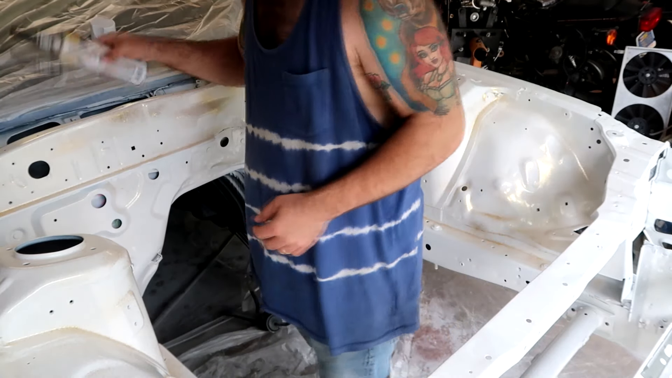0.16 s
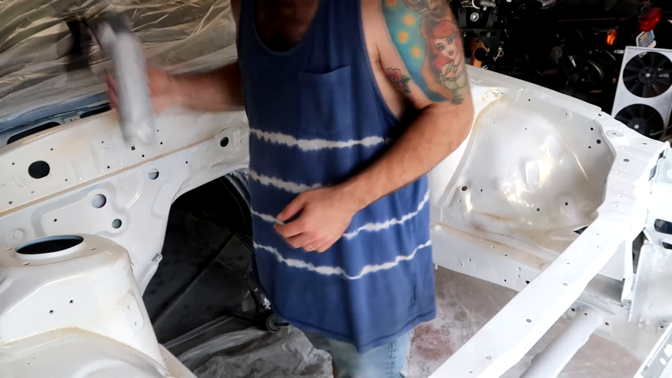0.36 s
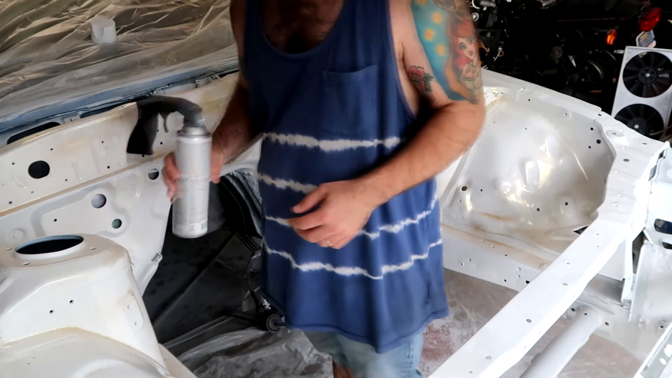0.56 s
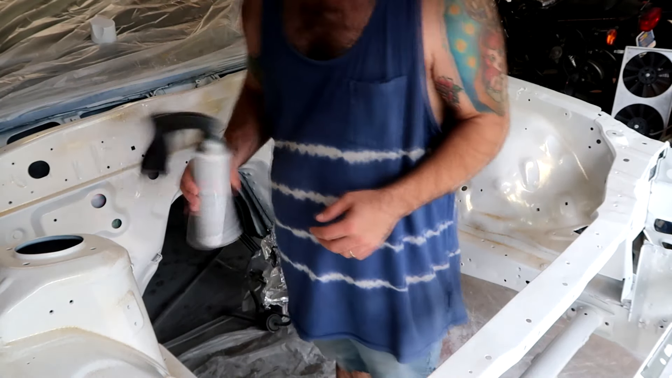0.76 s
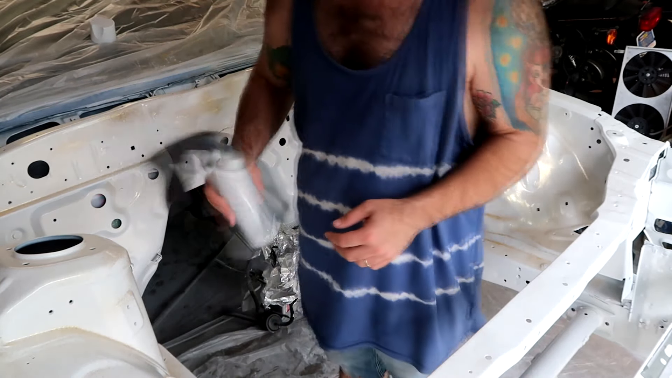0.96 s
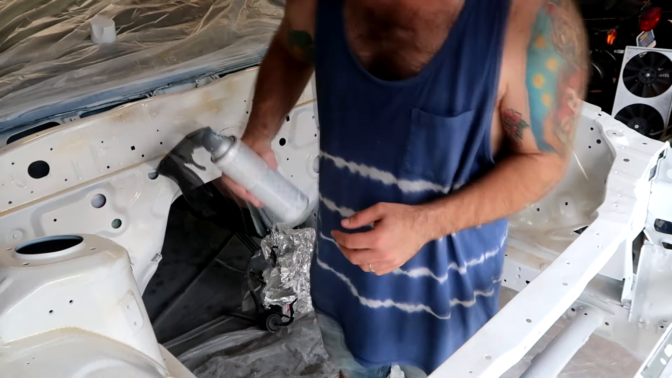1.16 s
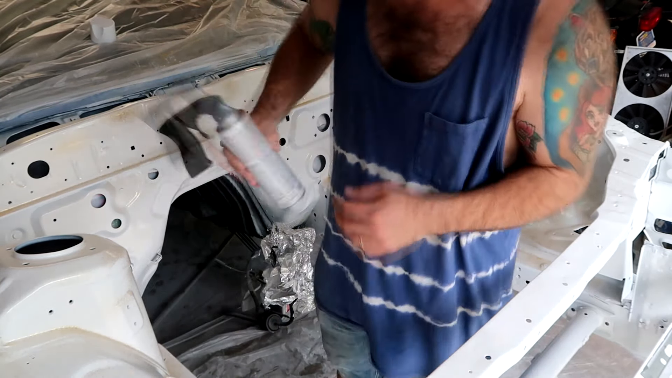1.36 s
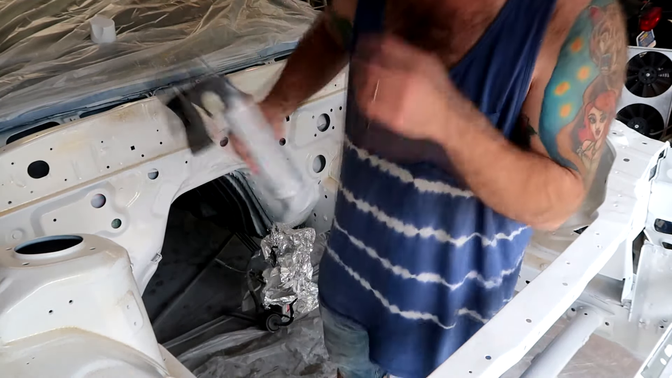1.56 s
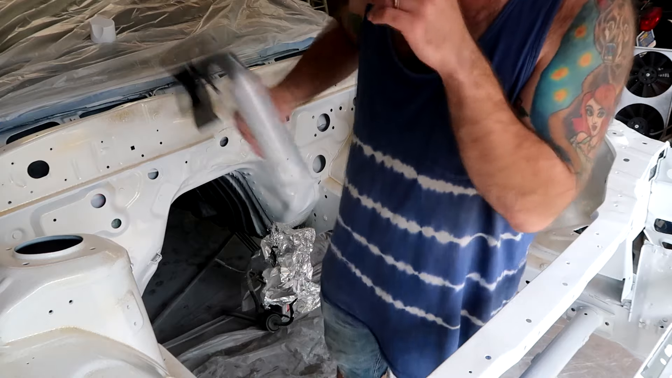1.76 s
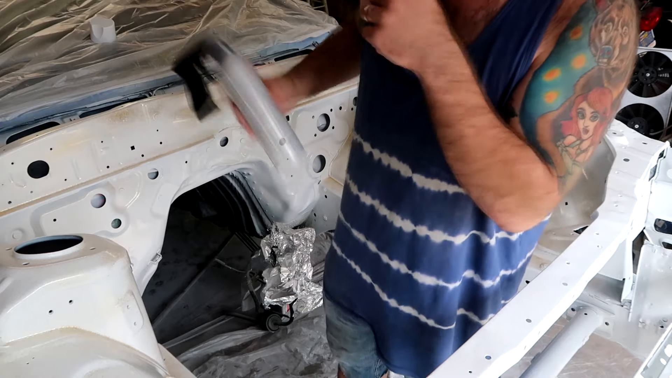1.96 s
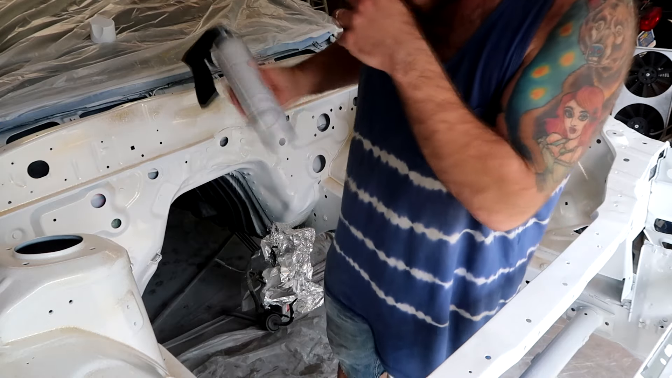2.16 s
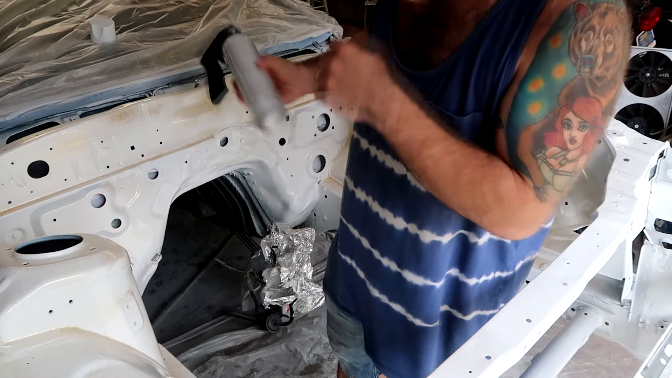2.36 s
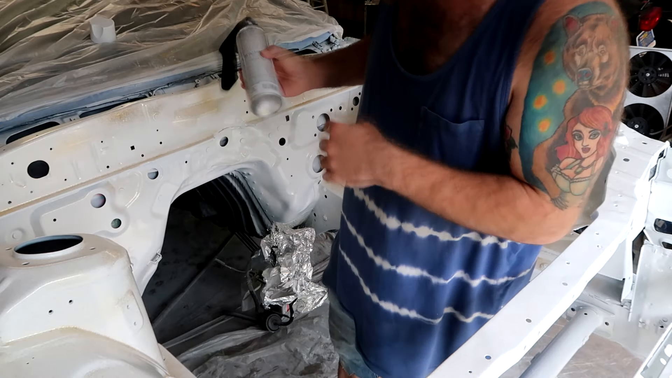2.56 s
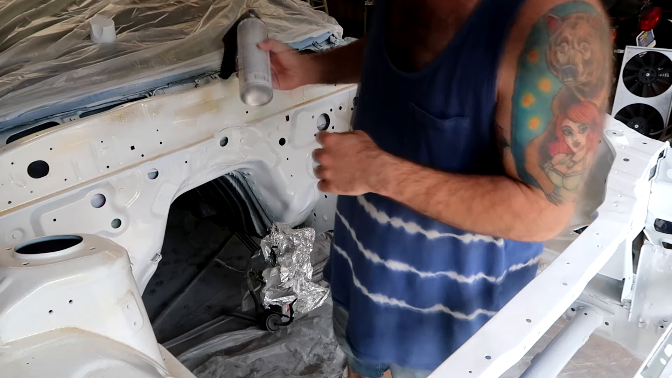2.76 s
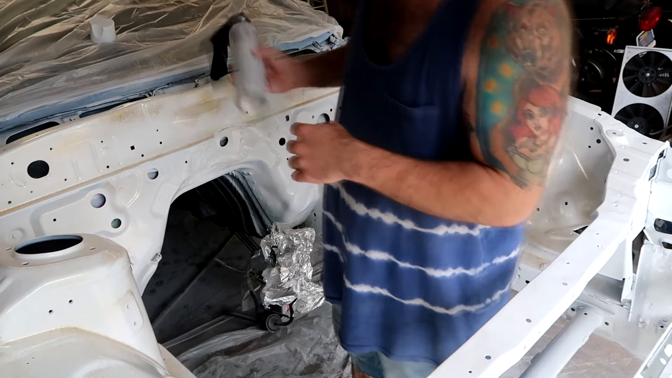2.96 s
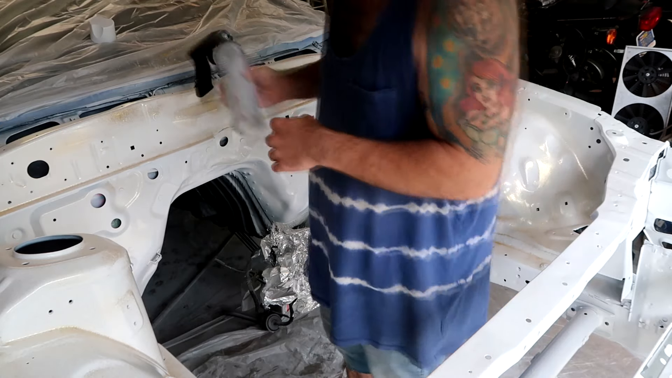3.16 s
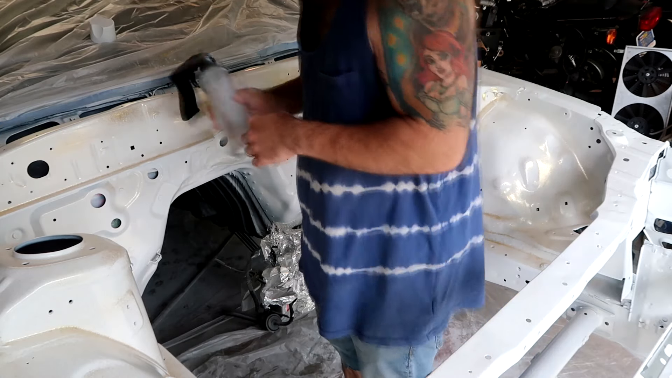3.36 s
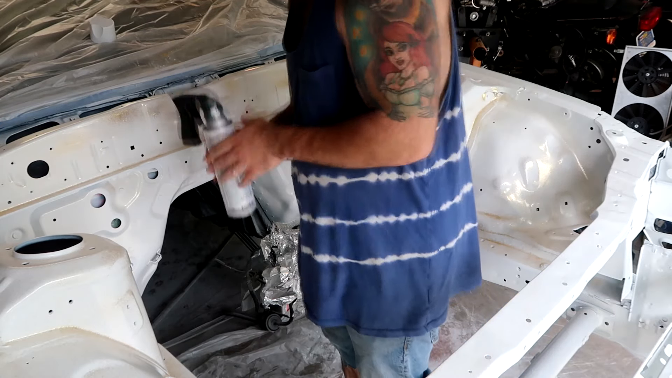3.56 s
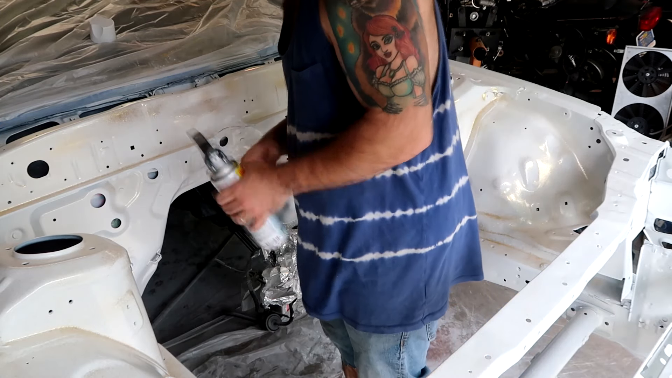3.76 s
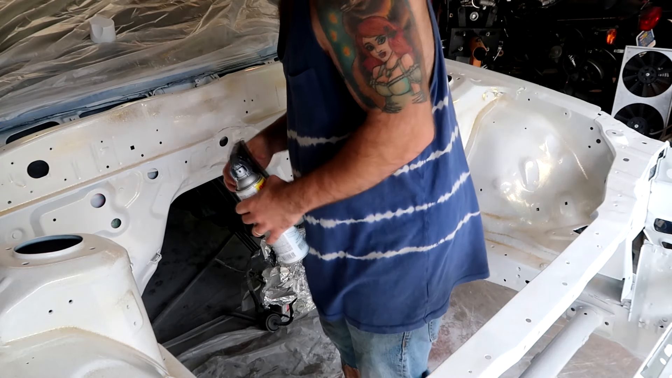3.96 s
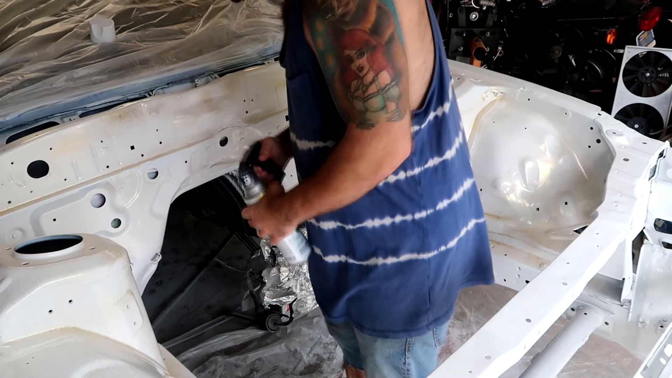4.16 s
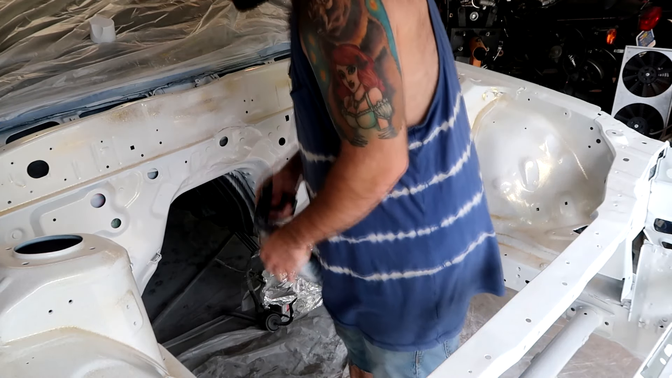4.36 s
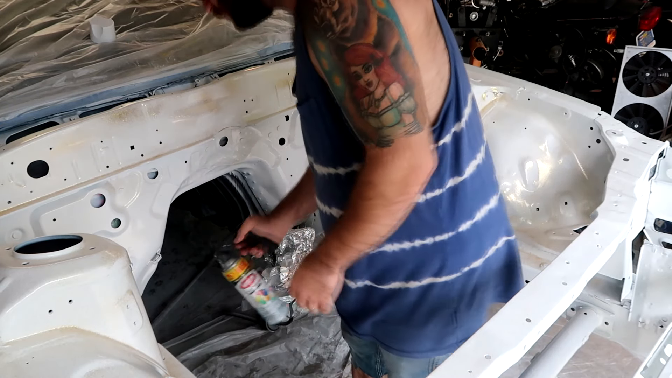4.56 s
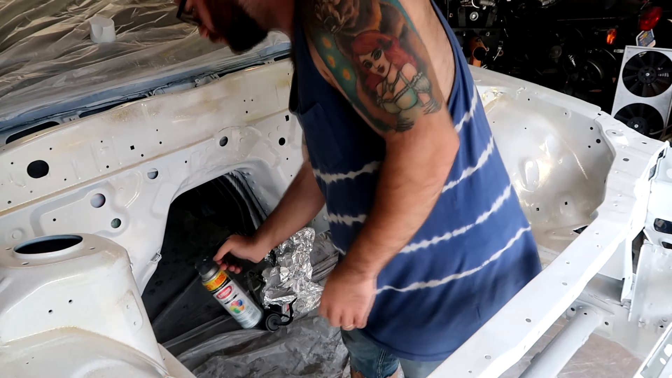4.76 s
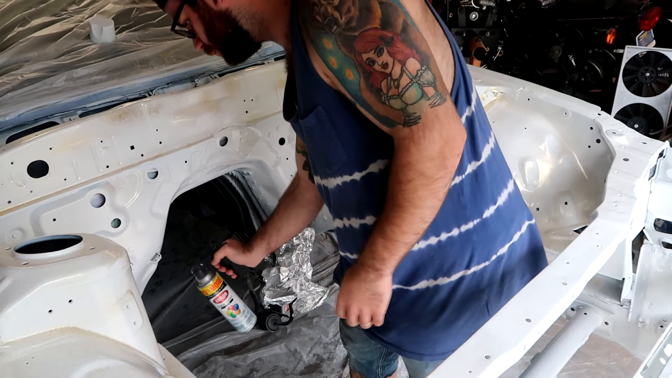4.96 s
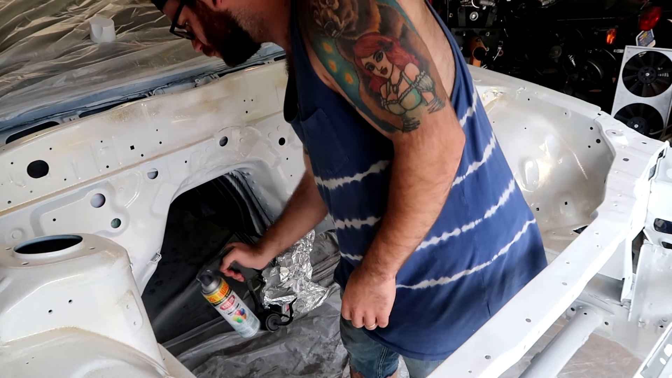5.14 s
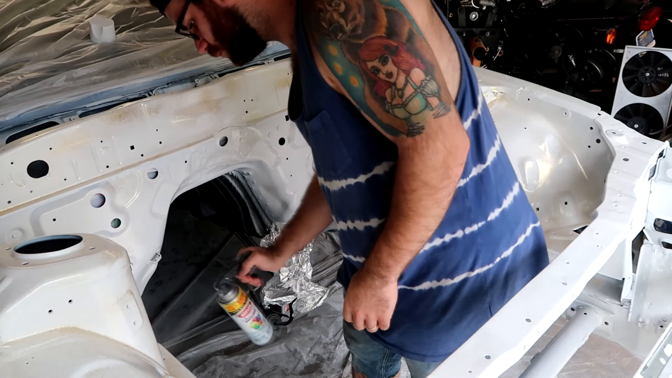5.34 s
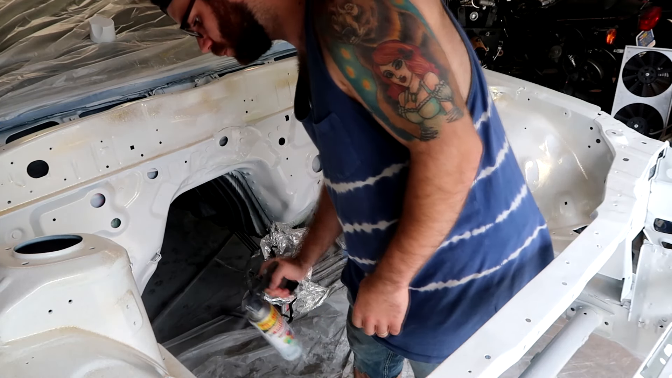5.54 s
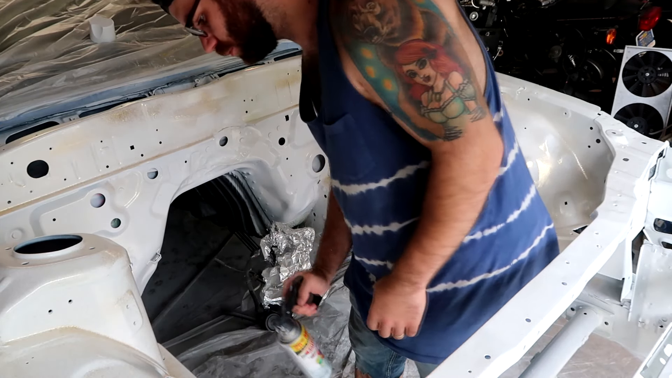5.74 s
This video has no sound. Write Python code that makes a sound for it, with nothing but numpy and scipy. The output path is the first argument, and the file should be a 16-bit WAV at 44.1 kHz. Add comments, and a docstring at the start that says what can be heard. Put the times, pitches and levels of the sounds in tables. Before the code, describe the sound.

Close to the microphone in a garage, a can scrapes lightly as it is picked up, then its mixing ball rattles wildly against thin steel, with short room echoes. The rattle loosens, weakens and stops; after a brief gap and a soft thud, spray hisses steadily with dull bumps over faint fan hum.

```python
"""Shaking and spraying a paint can

A spray paint can is picked up with a few scrapes and shaken hard in a garage. Its mixing ball strikes the thin
steel shell, rebounds and rolls: contact pulses through the shell's modes, with noise echoes for the room.
The rattle dies away, the valve opens and paint hisses out as flickering bands of noise around a narrow tone.
Brief squeaks, puffs of air and dull thuds come and go; a fan's noise and wavering tones hum over a low rumble.
"""
import sys
import numpy as np
from scipy import signal
from scipy.fft import rfft, irfft, next_fast_len
from scipy.io import wavfile
from scipy.ndimage import uniform_filter1d

SR = 44100
rng = np.random.default_rng(int(sys.argv[2]) if len(sys.argv) > 2 else 0)


def dump_mix(stems):
    """Bounce the given channels to the path in sys.argv[1] as a 16-bit WAV at rate SR."""
    frames = np.atleast_2d(stems).T  # one column per channel
    limited = np.clip(frames, -1, 1)  # hard clip at full scale
    pcm = np.round(limited * 32767).astype(np.int16)
    wavfile.write(sys.argv[1], SR, pcm)


N = 255807
TIME = np.arange(N) / SR

# Blows of the ball. Each row: start in seconds, clank level in dB before the ball's overall gain,
# strongest ring in Hz, second ring in Hz (often its close twin), ping in Hz, first rebound as a ratio to the
# contact, its delay in ms, then in dB relative to the clank: hollow knock, bright crack, high ping, steely tick.
BLOWS = [(0.2089, -22.5, 3550, 3600, 5170, 1.1, 2.15, -11.0, 4.5, -1, -9.5),
         (0.4892, -14, 2050, 2050, 5030, 1.3, 2.0, -13.5, -6.5, -4.5, -9.5),
         (0.5489, -2, 2170, 2160, 5030, 2.3, 2.1, -19, -7.5, -12.5, -16),
         (0.5554, -11.5, 2120, 2130, 4800, 1.4, 1.87, -12, -12, -11, -20.0),
         (0.561, -5.5, 2060, 2100, 5200, 0.94, 2.1, -25, -8, -10, -14.5),
         (0.5932, -19, 1900, 1910, 5200, 0.4, 4.7, -19, 0, -2, -6),
         (0.6251, -6.5, 2240, 2050, 4400, 1.8, 2.1, -13, -2.5, -20, -19.5),
         (0.6287, -11.5, 2530, 2470, 5140, 0.36, 2.4, -9, -8, 1.5, -11),
         (0.6415, -19, 2550, 2580, 4900, 1.6, 4.1, -13, 8, -17, -11),
         (0.6587, -13.0, 1850, 1910, 5300, 0.56, 2.25, -18, -8.5, -23, -22.5),
         (0.6717, -3, 1900, 1930, 5470, 0.33, 1.4, -19.5, -4.5, -10.5, -17),
         (0.7032, -7, 2210, 1640, 5500, 0.4, 2.65, -31, -6, -31, -26),
         (0.707, -9.5, 1800, 1770, 5400, 0.46, 2.15, -20, -6, -19, -21.5),
         (0.716, -9, 2200, 2190, 4600, 0.55, 2.2, -24.0, -13, -14, -20.0),
         (0.728, -20, 1700, 1700, 4700, 0.33, 5.7, -14, 5, -9.0, -12),
         (0.7379, -17, 3230, 3220, 4670, 0.98, 1.4, -17, 6.5, -1.5, -8),
         (0.7449, -26, 3120, 3140, 5900, 0.4, 2.2, -16, 12, -3, -11.0),
         (0.7586, -15, 2630, 1700, 5400, 0.58, 1.55, -12, 1, -10.0, -20.0),
         (0.7655, -22, 1950, 2400, 5100, 0.4, 3.6, -14.0, 3, -11.5, -19.5),
         (0.786, -8.0, 1650, 1700, 4900, 1.4, 1.9, -26, -18, -19.0, -22.5),
         (0.794, -15, 2680, 2540, 4400, 1.3, 1.9, -16, -4.5, -12.0, -15.5),
         (0.8007, -13, 2550, 2540, 4500, 0.6, 1.4, -20, -9.5, -15, -21.0),
         (0.8094, -21, 1800, 2260, 4670, 0.45, 4.5, -4, -6, -11.5, -18),
         (0.846, -1, 2070, 3140, 4900, 0.55, 2.4, -17.5, 1, -7.5, -18.5),
         (0.8724, -7, 2380, 2380, 4500, 1.4, 2.7, -24, -13, -12, -18.5),
         (0.8969, -10, 2040, 1980, 5300, 1.6, 2.15, -22, 1, -12, -18),
         (0.9211, -21, 3230, 3200, 5450, 0.59, 1.4, -20, 8.5, -2.0, -5),
         (0.9261, -18, 3300, 3300, 5100, 0.56, 2.3, -21, 6.5, -2, -18),
         (0.9721, -3.5, 2000, 2150, 4900, 0.78, 2.3, -15, -9, -13.0, -22),
         (0.9872, -7.0, 2300, 2200, 4500, 1.4, 1.75, -13, -17, -16.5, -24.5),
         (1.055, -2.5, 1870, 1770, 5400, 0.23, 1.43, -18, -1.5, -13, -19.5),
         (1.0589, -8, 1970, 1700, 5200, 0.34, 1.8, -16, -18, -14, -19),
         (1.082, -17, 2200, 2120, 4840, 0.76, 2.4, -15, -11.5, -14.0, -24.0),
         (1.105, -11, 1970, 1930, 5100, 0.5, 3.7, -13, -3, -12, -17),
         (1.13, -11.0, 2000, 1340, 4800, 0.55, 1.9, -14, -2.5, -12.5, -19.0),
         (1.1385, -15.5, 1750, 1280, 4800, 0.59, 3.9, -9, -16, -18.0, -17),
         (1.1678, -16.5, 1450, 1420, 4500, 0.45, 2.4, -16, -8, -21, -22),
         (1.1901, -15.5, 1250, 1210, 4700, 0.74, 2.1, -16, -10.5, -18.0, -27),
         (1.2304, -13.5, 1290, 4080, 4400, 0.6, 2.35, -18, -11.0, -12.5, -19.5),
         (1.2424, -11.5, 3000, 3000, 4400, 0.46, 1.37, -14, 10.5, 3, -4),
         (1.3127, -2, 1920, 1900, 5000, 2.7, 1.72, -14, -6, -19, -18.5),
         (1.3766, -12.5, 1900, 2000, 4800, 1.6, 2.3, -11, -5, -12, -19),
         (1.448, -5.5, 2220, 2160, 4950, 1.04, 0.86, -16, 6, -4, -17),
         (1.4972, -21.5, 1950, 1910, 4400, 0.5, 2.9, -9, -8, -7, -13),
         (1.5334, -3.5, 2010, 1910, 4750, 0.42, 2.76, -19, -5, -20, -20.5),
         (1.5557, -11.5, 1300, 1280, 4400, 0.5, 2.15, -10.5, -7, -16.5, -32),
         (1.587, -15.5, 2440, 1840, 4500, 0.75, 2.2, -17, -4, -16, -18),
         (1.5998, -17, 2500, 2490, 4530, 0.66, 2.6, -12.5, -11, -11.5, -19),
         (1.7687, -3.5, 2380, 3600, 4900, 0.34, 1.9, -19.5, -7, -11.5, -24),
         (1.886, -21.5, 2250, 1480, 4730, 0.51, 2.2, -8.5, -2.5, -10, -18),
         (1.982, -4, 1880, 2500, 5500, 0.19, 2.2, -20.5, -5.5, -10.5, -25.5),
         (2.0055, -16, 1800, 1770, 5500, 1, 2.05, -10, -2, -24, -15),
         (2.1627, -23.5, 2250, 2190, 4500, 0.68, 2.15, -13, -11.5, -22, -20),
         (2.2258, -6.5, 2050, 1820, 4900, 0.52, 1.5, -17.5, -12, -25, -16.5),
         (2.252, -8, 2780, 2640, 4500, 1.2, 2, -14, -12, -17, -26),
         (2.2993, -1.5, 2130, 1900, 4530, 0.78, 1.85, -29, 4, -5.5, -15),
         (2.3262, -20, 1900, 1910, 5700, 0.4, 2.2, -7, -16, -13.5, -31),
         (2.354, -34, 1950, 1910, 5200, 0.5, 2.2, -3, -9, -13, -23),
         (2.3892, -7.5, 2070, 2050, 4900, 0.48, 2.05, -13, -2, -22, -19),
         (2.4821, -23.5, 2550, 2540, 4460, 0.7, 2, -17, -6, -11, -16),
         (2.529, -12.5, 2040, 2700, 4600, 0.64, 2.0, -15.5, -10, -19.5, -32),
         (2.5508, -28.5, 3200, 3330, 4800, 1.3, 2.4, -25, 10, 0, 0),
         (2.5739, -14.5, 2300, 2240, 4600, 0.47, 1.8, -12, 5, -6, -18),
         (2.6841, -11.5, 1990, 1980, 5350, 1, 1.42, -14, -6, -10.5, -21.5),
         (2.8167, -6.0, 2100, 2100, 4960, 0.73, 2.1, -11, -6.5, -13.5, -18),
         (2.865, -18.5, 1900, 4150, 4680, 0.33, 1.6, -14, -21, -9, -33),
         (2.9119, -14.0, 2560, 2560, 4400, 1.2, 2.3, -8.5, -3.5, -8.5, -19),
         (2.9608, -15.5, 2500, 2480, 4400, 0.47, 3.85, -5.5, -15, -13, -25),
         (3.007, -13.5, 2150, 2120, 5530, 0.39, 3.35, -10.5, -1, -21, -23.5),
         (3.034, -14, 1860, 1930, 4400, 0.6, 1.9, -10.5, -10, -17, -18),
         (3.058, -11, 1820, 1400, 4360, 0.8, 2.2, -14, -10.0, -14, -23),
         (3.2232, -5.5, 1420, 1400, 4700, 0.38, 2.4, -10, 1, -9.5, -18.5),
         (3.3398, -12, 2580, 1410, 4700, 0.34, 2.15, -12.5, -5, -15.5, -21.5),
         (3.3839, -12.5, 1530, 1020, 5200, 0.57, 2.2, -3.5, -8, -11.0, -20),
         (3.4442, -14, 1930, 1280, 4500, 0.6, 2.1, -9.5, -7, -13.5, -19.5),
         (3.4942, -21, 1500, 1490, 4500, 0.87, 2.3, -11, -9, -13, -20),
         (3.5245, -11.0, 1520, 1490, 5450, 0.64, 2.55, -20, -8, -10.5, -20.5),
         (3.5754, -13.5, 2800, 2780, 4470, 0.58, 1.96, -6.5, -6, -13, -20.5),
         (3.665, -27, 1940, 1890, 4400, 1.4, 2.3, -3, -9, -12, -16),
         (3.7454, -5, 2190, 2180, 5450, 1.2, 0.99, -12.5, -4, -9, -20.5),
         (3.8552, -11.5, 1970, 2080, 5460, 1.2, 1.53, -28, -8.5, -19.5, -25),
         (3.9393, -16.5, 2050, 2410, 5500, 0.96, 2.6, -25, -12.0, -23.5, -24),
         (3.9673, -12.5, 2020, 1950, 5130, 0.4, 3.8, -19, -9, -18.5, -20.5),
         (4.054, -14.5, 2050, 2050, 5300, 0.47, 3.9, -15, -5, -18, -23),
         (4.1095, -24.5, 2150, 2120, 4800, 0.74, 1.7, -9, -11.0, -28, -40),
         (4.1259, -17, 1850, 1840, 5830, 0.27, 3.8, -13, -0.5, -3, -17.0),
         (4.1336, -21, 2000, 1350, 5500, 1.6, 2.4, -6, -12, -20, -28),
         (4.1691, -23, 2060, 2050, 5640, 0.55, 1.6, -13.0, 2, -4, -18),
         (4.1893, -23.5, 1350, 1350, 5600, 0.49, 3.55, -7, -13, -25, -30),
         (4.2003, -20.5, 1900, 1910, 5800, 0.7, 1.4, -7.5, 1, -7.5, -18.0),
         (4.2331, -20.5, 2070, 2060, 5600, 0.7, 1.26, -10.5, 0, -5.5, -18),
         (4.2536, -17.0, 2060, 2050, 5700, 0.94, 2.35, -17, -13, -21.5, -32),
         (4.2836, -31, 2060, 2050, 5800, 1.3, 2.5, -10, -1.0, -7, -25),
         (4.3005, -30, 2050, 2610, 5700, 0.3, 2.35, -5, 3, -10, -24),
         (4.3206, -29.5, 1800, 1860, 5700, 1.4, 1.8, -9, -4, -9, -21),
         (4.3353, -28.5, 1970, 1860, 5800, 1.4, 2.3, -15, -1, -7, -15),
         (4.4431, -32, 2450, 2400, 5600, 0.52, 2.45, -3, -10, -17.5, -23)]
# The shell's overall response. Each row: frequency in Hz, level in dB.
SHELL_RESPONSE = [(150, -38), (400, -7.5), (700, -4.5), (1000, 1.5), (1450, 6), (1920, 7.5), (2450, 4.5),
                  (3250, 1), (4300, -6.5), (5600, -8), (6700, -17), (8300, -19.5), (11500, -21.5),
                  (16000, -36.5)]
# Crossovers between knock, clank, crack, ping and tick, in Hz.
ZONE_EDGES_HZ = [1150, 2550, 3900, 6400]
# Modes of the steel that ring on after a blow. Each row: frequency in Hz,
# level in dB relative to the blow before a chance factor, t60 in seconds.
RINGING_MODES = [(1877, -14.5, 0.17), (2050, -19, 0.12), (2560, -18, 0.22), (3210, -26.5, 0.35),
                 (4060, -25.5, 0.055), (5450, -36, 0.41), (5400, -37.5, 0.17), (7300, -58, .22),
                 (7900, -40, 0.073), (10900, -36, 0.18), (11570, -62, 0.13)]
# How loudly the ball rolls along the wall. Each row: time in seconds, level in dB before the rolling gain.
ROLLING_LEVEL = [(0.1, -70), (0.24, -35.5), (0.45, -43.5), (0.74, -26), (1.1, -35), (1.6, -36.5),
                 (2.15, -42), (3.05, -35), (3.65, -51), (4.28, -39), (4.5, -41.5), (4.9, -60)]
# Colour of what the room gives back. Each row: frequency in Hz, level in dB.
ROOM_COLOUR = [(300, -3), (700, 6), (1300, -1), (2300, -2.5), (3400, -4.5), (4400, -2.5), (6000, -2.5),
               (8000, -1.5), (15000, -13.5)]
# Colour of the jet's hiss. Each row: frequency in Hz, level in dB.
HISS_COLOUR = [(2500, 3), (3400, -3), (3930, 0), (4130, -6), (4330, -3), (4750, -2), (5350, 1.5),
               (5750, 2.5), (6450, 7), (7250, -1), (7750, 0.5), (8380, -6.5), (9100, 0), (11400, 3.5),
               (13000, 0.5), (15000, -4), (15800, -14)]
# The rush of the spray cone. Each row: time in seconds, level in dB.
RUSH_LEVEL = [(5.04, -36), (5.09, -45.5), (5.2, -36), (5.28, -38), (5.36, -43), (5.57, -43.5),
              (5.63, -38.5), (5.7, -45.5), (5.8, -45)]
# Resonances of the rush. Each row: frequency in Hz, width in Hz, level in dB relative to one another.
RUSH_MODES = [(1300, 630, -12), (2080, 570, 13), (2760, 350, -24)]
# The can scraping as it is picked up and turned in the hand.
# Each row: centre in seconds, level in dB, length in seconds.
SCRAPES = [(0.093, -50.5, 0.18), (0.172, -40, 0.026), (0.251, -35, 0.069), (0.39, -44.5, 0.14),
           (4.473, -49, 0.052), (4.556, -54, 0.051)]
# Colour of the scraping. Each row: frequency in Hz, level in dB.
SCRAPE_COLOUR = [(800, -51), (2000, 13), (2750, 1), (3500, 0), (4400, -1), (6500, -11), (12000, -14),
                 (16000, -25)]
# Brief hollow tones, squeaks and whistles. Each row: centre in seconds, level in dB, pitch in Hz,
# length in seconds, unsteadiness of pitch as a share.
TONES = [(0.26, -30, 2740, 0.042, .035), (0.245, -38, 3480, 0.049, 0.033), (0.395, -46, 4320, 0.054, 0.017),
         (0.453, -39, 1850, 0.041, .03), (0.52, -30.5, 570, 0.017, .055), (0.562, -37.5, 547, 0.098, .055),
         (0.708, -40, 555, 0.065, .055), (4.562, -50, 2670, 0.036, .02), (5, -48, 2890, 0.05, .005),
         (5.257, -40, 6500, .07, .008), (5.444, -36.5, 6270, 0.028, .008), (5.528, -34, 336, 0.038, .055),
         (5.53, -34.5, 403.3, 0.033, .055), (5.678, -34.5, 327, 0.076, .055)]
# Dull thuds. Each row: start in seconds, level in dB, pitch they fall to in Hz.
THUDS = [(0.027, -36, 265), (3.154, -24, 108), (4.636, -19, 103), (5.2267, -14.5, 102), (5.599, -14.5, 106)]
# Colour of the scuff that comes with each thud. Each row: frequency in Hz, level in dB.
SCUFF_COLOUR = [(120, 10.5), (230, 14.5), (330, -4), (700, -3.5), (1250, 1), (2400, -4.5), (3300, -7.5),
                (6000, -60)]
# Puffs of air from the widest swings. Each row: centre in seconds, level in dB, length in seconds.
GUSTS = [(0.83, -40, 0.069), (0.967, -46, 0.13), (1.19, -45, 0.052), (1.23, -34.5, 0.065),
         (1.336, -35.5, 0.057), (1.374, -30.5, 0.026), (1.432, -32, 0.039), (1.548, -43.5, 0.13),
         (1.65, -42.5, 0.15), (1.77, -47, 0.056), (1.893, -44, 0.11), (2.255, -45, 0.12),
         (2.807, -48, 0.17)]
# Colour of the stirred air. Each row: frequency in Hz, level in dB.
BUFFET_COLOUR = [(20, -26), (45, 11), (75, 11.5), (130, 6), (200, -0.5), (300, -8.5), (600, -40)]
# Colour of the small eddies that hit each port differently. Each row: frequency in Hz, level in dB.
EDDY_COLOUR = [(20, -22), (50, -3), (120, 5), (240, -5), (400, -19), (700, -38)]
# Level of the background, which sinks during the rattle. Each row: time in seconds,
# level in dB before each layer's own gain.
BACKGROUND_LEVEL = [(0.0, -46.5), (1.0, -48.5), (1.62, -56.5), (2.8, -57), (4.25, -48.5), (5.8, -45.5)]
# Colour of the fan's air noise. Each row: frequency in Hz, level in dB.
AIR_COLOUR = [(100, -0.5), (200, -2), (290, -7.5), (380, -1), (600, -6.5), (1250, -7), (2000, -13.5),
              (2900, -18), (5000, -29.5), (8000, -35), (15000, -64)]
# Fan tones. Each row: frequency in Hz, amplitude in dB relative to the background level.
FAN_TONES = [(122, -3), (237, -4.5), (415, -3.5)]
# Colour of the steady rumble. Each row: frequency in Hz, level in dB.
RUMBLE_COLOUR = [(20, -34), (45, -8), (75, 3.5), (125, -3), (165, -9.5), (225, -12), (300, -28), (600, -64)]
# Difference between the two microphone ports. Each row: frequency in Hz, side relative to mid in dB.
PORT_WIDTH = [(60, -44), (200, -11), (700, -16), (1300, -23), (2400, -19.5), (4400, -6.5), (7000, -2),
              (15000, 0.5)]

REBOUND_KEPT = 0.42  # share of its force that each rebound passes on to the next
RING_DB, SECOND_DB, PING_DB = 8.5, 6.5, 8  # how far the modes favoured by the struck spot stand out
VALVE_S, VALVE_OPENING_S, JET_DB = 5.058, 0.0078, -39
# The jet's unsteadiness: depth in dB and changes per second
SPUTTER_DB, SPUTTER_PER_S, DRIFT_DB, DRIFT_PER_S = 1.6, 140, 2.0, 18
FLUTTER_DB, FLUTTER_PER_S = 0.5, 250
NOZZLE_HZ, NOZZLE_WIDTH_HZ, NOZZLE_DB = 1962, 50, -0.5  # narrow tone; level relative to the rush
AIR_FLICKER_DB = 2.0
TOP_HZ = 15900  # upper edge of the finished sound


def amp(db):
    """Turn decibels into gain."""
    return 10 ** (np.asarray(db) / 20)


def unit(x):
    """Scale to rms 1."""
    return x / np.sqrt(np.mean(x ** 2) + 1e-20)


def curve(rows):
    """Draw an automation line through (seconds, value) rows."""
    return np.interp(TIME, *np.transpose(rows))


def swell(s, length):
    """Shape a bell envelope that rises and fades around a moment."""
    return np.exp(-np.minimum((2 * (TIME - s) / length) ** 2, 50))


def walk(rate):
    """Smooth chance with spread 1, changing about rate times a second."""
    hold = max(int(SR / rate), 1)
    steps = np.repeat(rng.standard_normal(N // hold + 1), hold)
    return unit(uniform_filter1d(steps, hold)[:N])


def spectrum_db(points, f):
    """Join (Hz, dB) points on a log-frequency axis."""
    hz, db = np.transpose(points)
    return np.interp(np.log(f + 1), np.log(hz), db)


def colour(x, points):
    """Equalise a sound with a curve of (Hz, dB) points."""
    size = next_fast_len(len(x))
    gain = amp(spectrum_db(points, np.fft.rfftfreq(size, 1 / SR)))
    return irfft(rfft(x, size) * gain, size)[:len(x)]


def causal(db):
    """Minimum phase: the response with this gain whose energy comes as early as it can."""
    cepstrum = irfft(np.log(amp(db)))
    half = len(cepstrum) // 2
    cepstrum[1:half] *= 2
    cepstrum[half + 1:] = 0
    return np.exp(rfft(cepstrum))


def ports(mid, side):
    """Two close microphone ports: alike in the middle range, unrelated in the treble."""
    side = colour(side, PORT_WIDTH)
    return np.array([mid + side, mid - side])


def noise(points):
    """Stereo noise of a given colour, rms 1 in the middle."""
    mid, side = (unit(colour(rng.standard_normal(N), points)) for _ in range(2))
    return ports(mid, side)


def ball(gain_db=-20.5, spread_db=-4.5):
    """The mixing ball's blows: the struck spot sets the colour, each with its own ring and echoes; mid and side."""
    out = np.zeros((2, N))
    for s, db, ring_hz, second_hz, ping_hz, rebound, rebound_ms, knock_db, crack_db, ping_db, tick_db in BLOWS:
        zones_db = (knock_db, 0, crack_db, ping_db, tick_db)
        sound = blow(ring_hz, second_hz, ping_hz, rebound, rebound_ms, zones_db)
        lead = sound.shape[1] // 32  # the contact sits this many samples in
        to_room = amp(spread_db) * colour(sound[2], ROOM_COLOUR)[None]
        hit = garage(sound[:2], to_room)
        ring = np.linalg.norm(sound[0]) * ringing()
        hit[0, lead:lead + len(ring)] += ring
        start = int(s * SR) - lead
        out[:, start:start + hit.shape[1]] += amp(db + gain_db) * hit[:, :N - start]
    return out


def blow(ring_hz, second_hz, ping_hz, rebound, rebound_ms, zones_db, ring_width_hz=180, ping_width_hz=250,
         shimmer=0.082, shimmer_hz=7000, shell_t60=0.059, room_ring=0.44, size=2048, count=3):
    """A contact and weakening rebounds excite crowded, paint-damped shell modes; mid, side and room feed."""
    t, f = np.arange(size) / SR, np.fft.rfftfreq(size, 1 / SR)
    contact = np.zeros((3, size))
    contact[::2, 0] = 1
    delays_s = rebound_ms / 1000 * np.cumsum(np.r_[1, rng.uniform(.7, 1.3, count)])
    contact[0, (SR * delays_s).astype(int)] += rebound * REBOUND_KEPT ** np.arange(count + 1)

    # the modes crowd more and more towards the treble
    crowd = shimmer * rebound * rng.standard_normal((2, size)) * amp(-60 * t / shell_t60)
    force = rfft(contact)
    force[:2] += rfft(crowd) * (1 + (f / shimmer_hz) ** 2)

    # the struck spot decides which modes ring most; the room gets a more even mix
    favoured = ((ring_hz, ring_width_hz, RING_DB),
                (second_hz, ring_width_hz, SECOND_DB),
                (ping_hz, ping_width_hz, PING_DB))
    peaks_db = sum(db / (1 + ((f - hz) / width) ** 2) for hz, width, db in favoured)
    shell_db = spectrum_db(SHELL_RESPONSE, f)
    beamed, even = (causal(shell_db + share * peaks_db) for share in (1, room_ring))
    sound = force * np.array([beamed, beamed, even])

    # it also balances the five groups of modes, from knock to tick, with soft crossovers
    above = [np.interp(f, [.88 * hz, 1.12 * hz], [0, 1]) for hz in ZONE_EDGES_HZ]
    out = 0
    for lower, upper, db in zip([1] + above, above + [0], zones_db):
        part = np.roll(irfft(sound * (lower - upper)), size // 32, axis=1)
        out = out + amp(db) * part / np.sqrt(np.mean(part ** 2, axis=1, keepdims=True))
    return out


def ringing(detune=0.0033):
    """The few modes that the hand does not damp ring on, in a new mix for every blow."""
    t = np.arange(SR // 4) / SR
    chance = rng.standard_normal((len(RINGING_MODES), 2))
    out = np.zeros(len(t))
    for (hz, db, t60), (share, off) in zip(RINGING_MODES, chance):
        mode = np.sin(2 * np.pi * hz * (1 + detune * off) * t) * amp(-60 * t / t60)
        out += amp(db) * share * unit(mode)
    return out / np.sqrt(len(t))


def rolling(gain_db=-7.0, contacts_per_s=1100, spread_db=2.5):
    """The ball rolls along the wall: dense tiny contacts into the same shell; mid and side."""
    strength = amp(spread_db * np.minimum(rng.exponential(size=N), 3))
    contacts = (rng.random(N) < contacts_per_s / SR) * strength
    grains = np.array([unit(colour(contacts * rng.choice([-1, 1], N), SHELL_RESPONSE)) for _ in range(2)])
    grains = grains * amp(curve(ROLLING_LEVEL) + gain_db)
    return garage(grains, grains[:1])[:, :N]


def garage(x, spread, wet_db=-1.5, t60=0.31, treble_t60=0.29, early_db=-9, early_t60=0.17, gap_s=0.0021,
           reflections_per_s=260):
    """Add echoes of what a sound spreads: single reflections off the car body, then the room's ring; mid, side."""
    t = np.arange(SR // 3) / SR
    after_gap = t > gap_s
    diffuse = rng.standard_normal((2, len(t)))
    low = signal.sosfilt(signal.butter(2, 5000, fs=SR, output="sos"), diffuse)
    high = signal.sosfilt(signal.butter(2, 5000, "high", fs=SR, output="sos"), diffuse)
    ring = (low * amp(-60 * t / t60) - 1.3 * high * amp(-60 * t / treble_t60)) * after_gap
    reflections = (rng.random(len(t)) < reflections_per_s / SR) * rng.standard_normal((2, len(t)))
    early = reflections * amp(-60 * t / early_t60) * after_gap
    echo = (amp(wet_db) * unit(ring) + amp(early_db) * unit(early)) / np.sqrt(len(t))
    out = signal.fftconvolve(spread, echo, axes=1)
    out[:, :x.shape[1]] += x
    return out


def spray():
    """The opening valve lets out the jet's hiss and the rush of mist, fluttering together."""
    valve = 1 - np.exp(-np.maximum(TIME - VALVE_S, 0) / VALVE_OPENING_S)
    return (jet_hiss() + mist_rush()) * valve * amp(FLUTTER_DB * walk(FLUTTER_PER_S))


def jet_hiss(count=16):
    """The nozzle's turbulent jet: noise split into bands that each sputter and drift alone."""
    size = next_fast_len(N)
    jet = rfft(noise([(1000, -42)] + list(HISS_COLOUR)), size)
    f, centres = np.fft.rfftfreq(size, 1 / SR), np.geomspace(3000, 15000, count)
    hiss = np.zeros((2, N))
    for pick in np.eye(count):
        band = irfft(jet * np.interp(f, centres, pick), size)[:, :N]
        hiss += band * amp(SPUTTER_DB * walk(SPUTTER_PER_S) + DRIFT_DB * walk(DRIFT_PER_S))
    return hiss * amp(JET_DB)


def mist_rush(side_db=-13):
    """The wider cone of mist: turbulence through broad resonances, around one narrow tone."""
    lowpass = signal.butter(4, 3300, fs=SR, output="sos")
    turbulence = signal.sosfilt(lowpass, rng.standard_normal((2, N)))
    modes = (amp(db) * signal.lfilter(*signal.iirpeak(hz, hz / width, fs=SR), turbulence)
             for hz, width, db in RUSH_MODES)
    mid, side = unit(sum(modes))
    nozzle = signal.iirpeak(NOZZLE_HZ, NOZZLE_HZ / NOZZLE_WIDTH_HZ, fs=SR)
    mid = mid + amp(NOZZLE_DB) * unit(signal.lfilter(*nozzle, rng.standard_normal(N)))
    side = amp(side_db) * side
    return np.array([mid + side, mid - side]) * amp(curve(RUSH_LEVEL))


def scrape(grip_db=2):
    """The can slides and catches: short, uneven rasps of coloured noise."""
    strokes = sum(amp(db) * swell(s, length) for s, db, length in SCRAPES)
    return noise(SCRAPE_COLOUR) * strokes * amp(grip_db * walk(99.1))


def tones(rough_db=2.0, sag_per_s=0.5):
    """Brief tones and squeaks swell and fade, sagging in pitch with a waver and a rough level."""
    out = np.zeros(N)
    for s, db, hz, length, waver in TONES:
        pitch = hz * (1 + waver * walk(700) - sag_per_s * (TIME - s))
        out += amp(db) * swell(s, length) * np.sin(2 * np.pi * np.cumsum(pitch) / SR)
    return amp(rough_db * walk(150)) * out


def thuds(rise_s=0.0064, drop=2.66, drop_s=0.0017, scuff_db=-14, scuff_t60=0.3, boom_db=-18, boom_t60=0.24,
          lowest_hz=65):
    """Each thud is a heavily damped low cycle or two, falling in pitch, with a scuff and a short boom after it."""
    out = np.zeros(N)
    scuff = unit(colour(rng.standard_normal(N), SCUFF_COLOUR))
    boom = unit(colour(rng.standard_normal(N), RUMBLE_COLOUR))
    for s, db, hz in THUDS:
        span = slice(int(s * SR), min(int(s * SR) + SR // 4, N))
        t = TIME[span] - TIME[span][0]
        pitch = hz * (1 + drop * np.exp(-t / drop_s))
        envelope = t / rise_s * np.exp(.5 - .5 * (t / rise_s) ** 2)
        push = np.sin(2 * np.pi * np.cumsum(pitch) / SR) * envelope
        tail = scuff[span] * amp(scuff_db - 60 * t / scuff_t60)
        tail = tail + boom[span] * amp(boom_db - 60 * t / boom_t60)
        out[span] += amp(db) * (push + tail * (1 - np.exp(-t / drop_s)))
    return signal.lfilter(*signal.butter(2, lowest_hz, "high", fs=SR), out)


def gusts(apart_db=-7, bumpy_db=4.5):
    """Wide swings send puffs of air against the microphone; their eddies differ at the two ports."""
    mid, side = (unit(colour(rng.standard_normal(N), points)) for points in (BUFFET_COLOUR, EDDY_COLOUR))
    side = amp(apart_db) * side
    puffs = sum(amp(db) * swell(s, length) for s, db, length in GUSTS)
    return np.array([mid + side, mid - side]) * puffs * amp(bumpy_db * walk(35.3))


def background(air_db=4, rumble_db=-0.5, waver=0.00663):
    """A fan's flickering air noise and wavering tones over a low rumble."""
    air = amp(air_db + AIR_FLICKER_DB * walk(27)) * noise(AIR_COLOUR)
    fan = np.zeros(N)
    for hz, db in FAN_TONES:
        level = amp(db + 2 * walk(4.0))
        fan += level * np.sin(2 * np.pi * hz * np.cumsum(1 + waver * walk(15)) / SR)
    rumble = noise(RUMBLE_COLOUR) * amp(rumble_db + 0.54 * walk(8.5))
    return (air + fan + rumble) * amp(curve(BACKGROUND_LEVEL))


def scene():
    """Mix the can in its room, the spray and the small noises over the background."""
    can = ports(*(ball() + rolling()))
    return can + scrape() + spray() + thuds() + tones() + gusts() + background()


def record(dry, threshold_db=-19, slope=1.0, memory_s=0.033, late_s=0.0028):
    """Gain control ducks loud sound a moment late; peaks clip at full scale and the top is cut."""
    keep = np.exp(-1 / (memory_s * SR))
    power = np.mean(dry ** 2, axis=0)
    loudness = np.sqrt(signal.lfilter([1 - keep], [1, -keep], power))
    loudness = np.interp(TIME - late_s, TIME, loudness)
    ducked = dry * np.maximum(loudness / amp(threshold_db), 1) ** -slope
    top_cut = signal.ellip(8, .2, 70, TOP_HZ, fs=SR, output="sos")
    return signal.sosfilt(top_cut, np.clip(ducked, -1, 1))


dry = scene()
out = record(dry)
dump_mix(out)
```